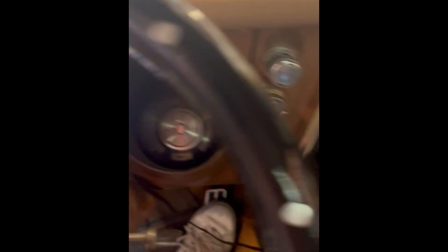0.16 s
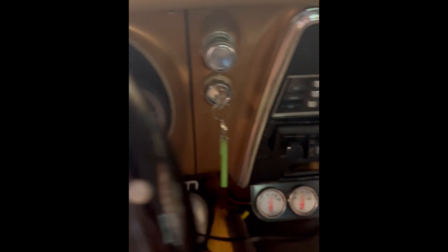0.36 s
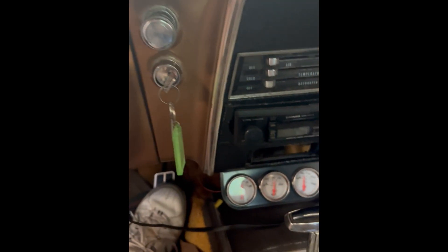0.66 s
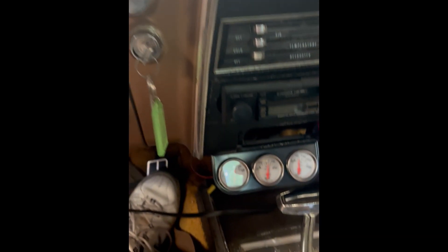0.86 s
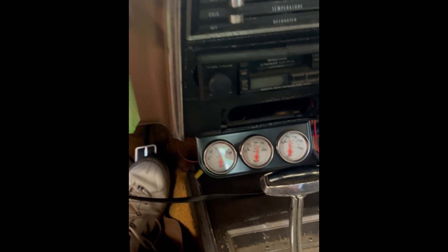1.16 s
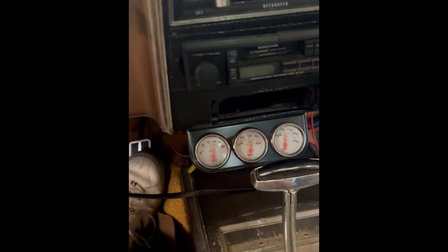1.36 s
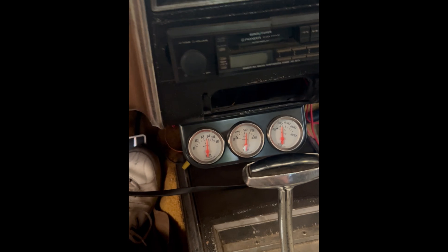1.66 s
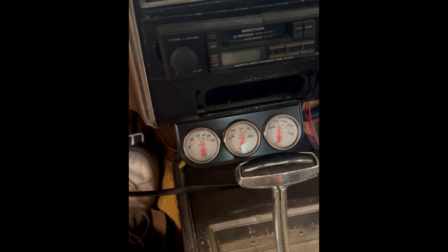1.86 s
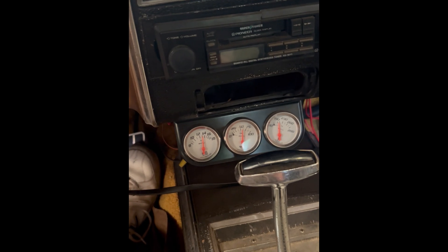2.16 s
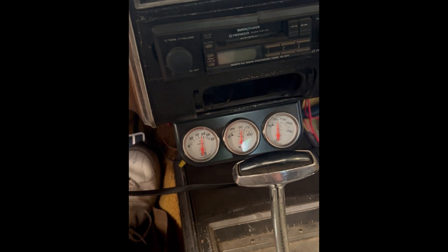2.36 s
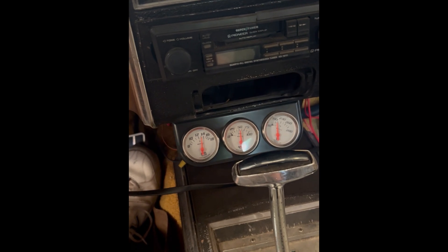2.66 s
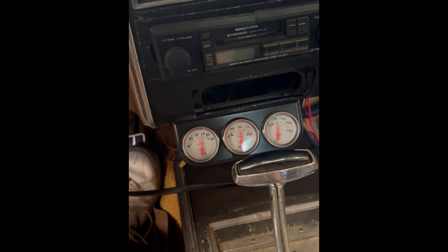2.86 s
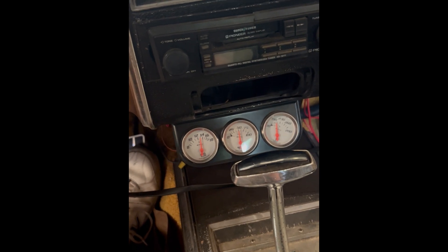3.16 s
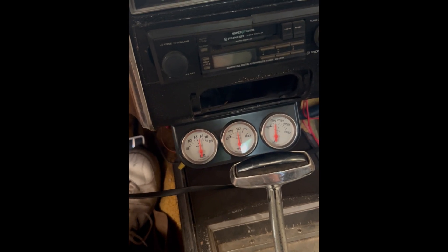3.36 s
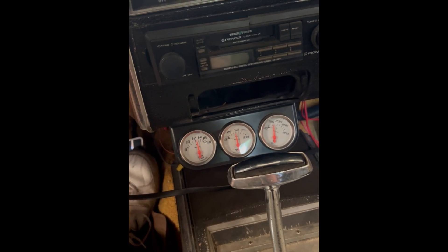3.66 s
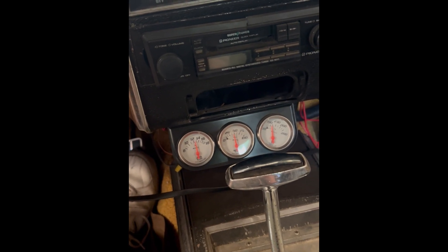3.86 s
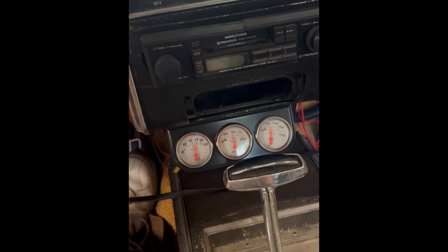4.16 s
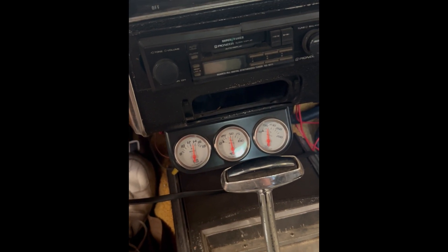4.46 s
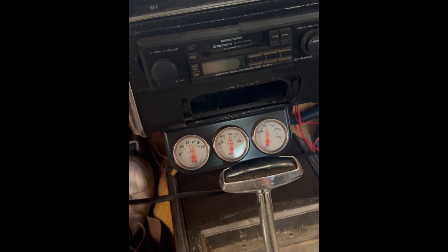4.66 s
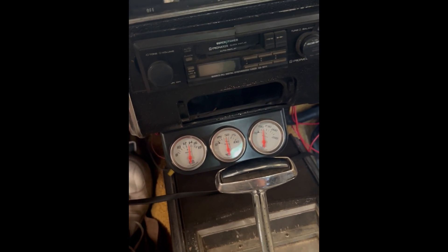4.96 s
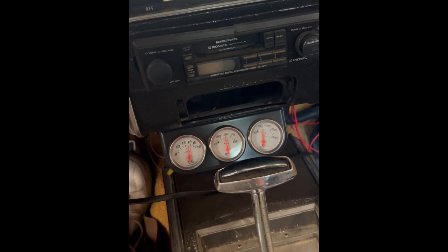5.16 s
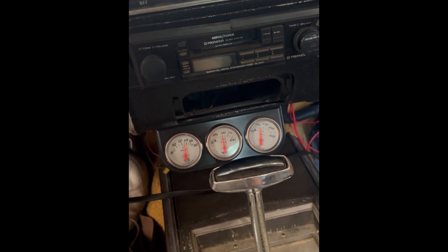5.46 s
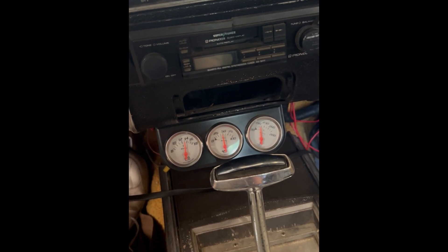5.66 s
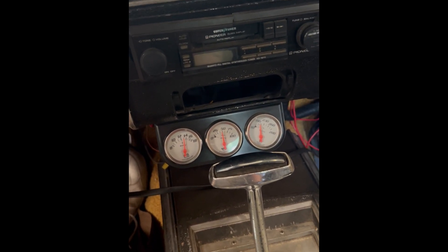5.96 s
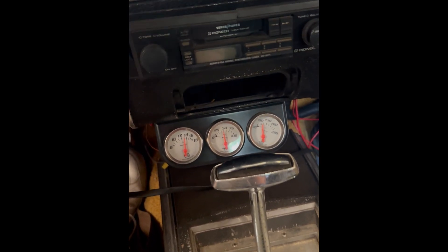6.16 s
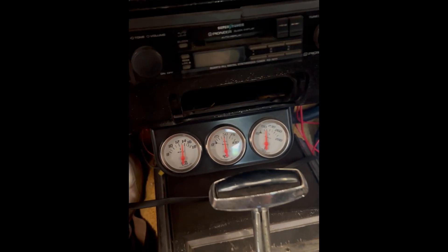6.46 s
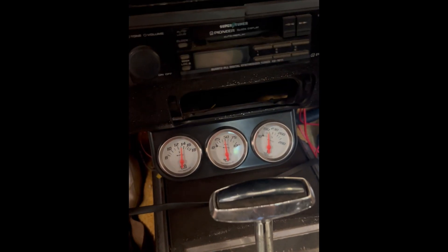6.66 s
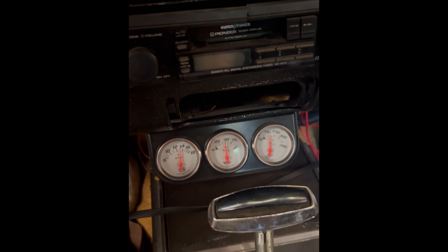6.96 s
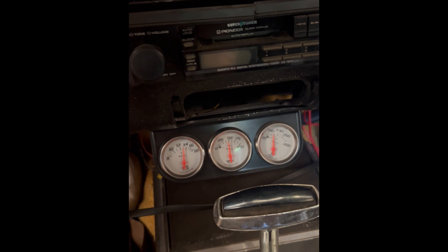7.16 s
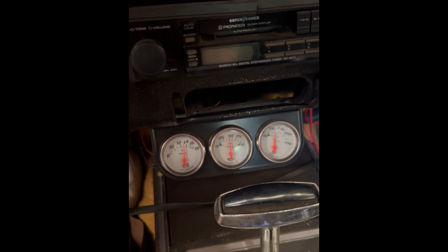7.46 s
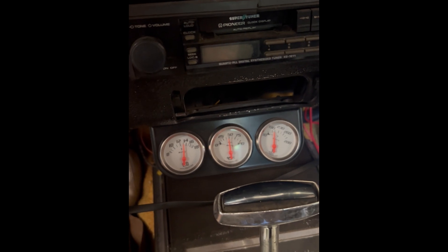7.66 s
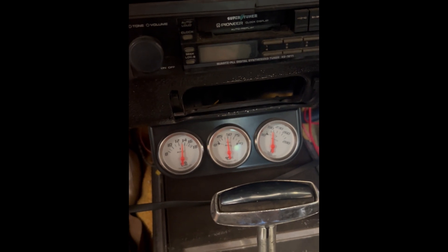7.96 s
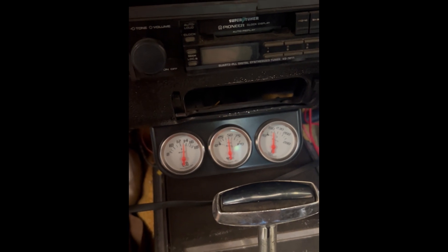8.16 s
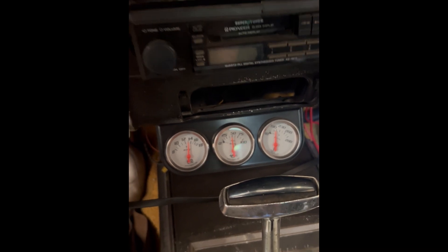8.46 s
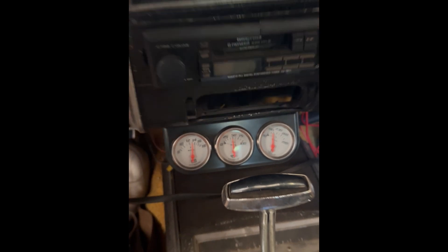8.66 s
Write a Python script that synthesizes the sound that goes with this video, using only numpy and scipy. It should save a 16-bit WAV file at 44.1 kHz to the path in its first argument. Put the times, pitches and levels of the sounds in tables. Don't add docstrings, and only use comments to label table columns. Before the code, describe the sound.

Close handheld stereo inside a stationary old car: two seconds of steady low engine boom under airy mechanical whirr, then a short whoosh as revs fall. The engine weakens, nearly dying with a few light ticks, then surges back into slow uneven throbbing. Loose panels clatter and buzz with each lurch, and small metal keys shiver brightly until the end.

```python
import sys
import numpy as np
from scipy import signal
from scipy.fft import rfft, irfft, next_fast_len
from scipy.io import wavfile
from scipy.ndimage import uniform_filter1d, minimum_filter1d

SR = 44100
rng = np.random.default_rng(int(sys.argv[2]) if len(sys.argv) > 2 else 0)


def nominal_scale(level):
    x = np.asarray(level, float) / 20
    return 10 ** x


def unload_wav(signal):
    wavfile.write(
        sys.argv[1],
        SR,
        np.round(np.clip(np.atleast_2d(signal).T, -1, 1) * 32767).astype(np.int16),
    )


N = 388521
RUN_IN = 8192

# t/s, firing rate/Hz
ENGINE = [(0, 100.7), (.6, 100.4), (1.2, 100.9), (1.85, 101.1), (2.0, 92), (2.2, 77), (2.6, 53), (3.0, 39),
          (3.5, 36), (4.0, 44), (4.45, 54.5), (4.75, 48.5), (5.0, 45), (5.5, 42.5), (6.5, 45), (7.0, 43.5),
          (8.2, 43), (8.81, 45)]
# f/Hz, width/Hz, level/dB
CABIN = [(44.3, 8.1, -26), (63.4, 5.2, -2.5), (79.7, 24, -11), (96.14, 8, 2.5), (118.2, 17.4, -11),
         (148.5, 21, -17)]


def rms_one(x):
    return x / np.sqrt(np.mean(x ** 2) + 1e-20)


def in_time(rows, early=0):
    s, *columns = np.transpose(rows)
    t = np.arange(-early, N) / SR
    return [np.interp(t, s, column) for column in columns]


def at_hz(points, hz):
    table = np.array(points, float)
    return np.interp(np.log(hz + 1), np.log(table[:, 0] + 1), table[:, 1])


def bandpass(x, low_hz, high_hz):
    return signal.sosfilt(signal.butter(2, [low_hz, high_hz], "band", fs=SR, output="sos"), x)


def resonate(x, modes):
    out = 0
    for k, (hz, width, db) in enumerate(modes):
        r = np.exp(-np.pi * width / SR)
        a = [1, -2 * r * np.cos(2 * np.pi * hz / SR), r * r]
        b = [(1 - r * r) / 2, 0, (r * r - 1) / 2]
        out = out + (-1) ** k * nominal_scale(db) * signal.lfilter(b, a, x)
    return out


def response(modes, hz):
    power = sum(nominal_scale(2 * db) / (1 + (2 * (hz - top_hz) / width) ** 2) for top_hz, width, db in modes)
    return np.sqrt(power)


def evened(x, span_s):
    return x / np.sqrt(uniform_filter1d(x ** 2, int(span_s * SR)) + 1e-12)


def drift(rate):
    r = np.exp(-80 * np.pi * rate / SR)
    slow = signal.lfilter([1], [1, -2 * r, r * r], rng.standard_normal(N // 40 + 2002))[2000:]
    return np.interp(np.arange(N) / 40, np.arange(len(slow)), rms_one(slow))


def at_ports(x, spectrum):
    # f/Hz, share
    likeness = [(100, 0.72), (1400, 0.93), (2400, 0.47), (4000, 0.3), (8000, 0.24), (15000, .7)]
    # f/Hz, phase/rad
    lead = [(100, 0), (2000, .1), (2800, 2.3), (3200, 3), (3500, .3), (4000, -.8), (5000, -1.8),
            (7000, -1.3), (15000, -1.6)]
    size = next_fast_len(N + RUN_IN)
    hz = np.arange(size // 2 + 1) * SR / size
    first, other = rfft(x, size) * nominal_scale(at_hz(spectrum, hz))
    alike = np.clip(at_hz(likeness, hz), 0, 1)
    right = alike * first * np.exp(-1j * at_hz(lead, hz)) + np.sqrt(1 - alike ** 2) * other
    return irfft(np.array([first, right]), size)[:, :N]


def orders(per_s, start, strongest, spread, wobble_db):
    # order, level/dB
    exhaust = [(1, -50), (3, -60), (4, -48), (5, -22.5), (6, -35), (7, -37.5), (8, 2.5), (9, -22.5),
               (10, -15), (11, -18), (12, -19), (13, -30.5), (14, -24.5), (15, -33.5), (16, -48), (17, -31),
               (18, -28), (19, -27.5), (20, -43.5), (21, -35), (22, -42.5), (24, -48.5), (25, -45.5),
               (26, -36), (27, -47.5), (28, -34), (29, -31.5), (30, -35.5), (31, -41), (32, -38)]
    held_hz = 100.7
    slow = per_s[::8]
    cycles = np.cumsum(slow) / SR + start
    out, power = 0, 0
    body = CABIN + [(312, 170, -43.5)]
    for order, db in exhaust:
        odd = order != 8
        gain = response(body, order * slow / 8) / response(body, order * held_hz / 8)
        gain = gain * nominal_scale(db + wobble_db * drift(3)[::8] * odd)
        gain = gain * (slow / held_hz) ** (3 * odd)
        phase = odd * (order * strongest + spread * order ** 2 + 0.13 * rng.standard_normal())
        out = out + gain * np.sin(2 * np.pi * (order * cycles + phase))
        power = power + gain ** 2 / 2
    return signal.resample_poly(out / np.sqrt(power), 8, 1, padtype="line")[:N]


def firings(per_s, steady, memory, fresh, jitter, width_hz):
    at = np.flatnonzero(np.diff(np.floor(np.cumsum(per_s) / SR)))
    chance = rng.standard_normal((2000, 3))
    keep = np.clip(memory, 0, .98)
    by_cylinder = chance[:, 2].reshape(-1, 8)
    lope = signal.lfilter([np.sqrt(1 - keep ** 2)], [1, -keep], by_cylinder, axis=0).ravel()
    strength = (steady + lope + fresh * chance[:, 1])[800:800 + len(at)]
    late = (jitter * chance[:len(at), 0] * SR / per_s[at]).astype(int)
    at = np.clip(at + late, 0, len(per_s) - 1)
    pulses = np.full(len(per_s), 1e-18)
    pulses[at] = strength
    return signal.sosfilt(signal.butter(1, width_hz, fs=SR, output="sos"), pulses)


def bumps(rows, half_s):
    kicks = np.zeros(N)
    s, db = np.transpose(rows)
    kicks[(s * SR).astype(int)] = db
    bell = np.exp(-.5 * (np.arange(-4000, 4001) / (half_s * SR)) ** 2)
    return signal.fftconvolve(kicks, bell, "same")


def lumps():
    # t/s, level/dB
    misfires = [(2.26, -3), (2.644, -7), (2.883, -2), (3.128, 2.5), (3.317, -3), (3.507, -2), (3.557, -11),
                (3.966, -3.5), (4.116, -10), (4.325, -7), (4.794, -6), (5.024, -3.5), (5.118, -7.1),
                (5.293, -6), (5.567, -1.5), (5.847, -12), (5.927, -5), (6.086, -5), (6.351, -8.5),
                (6.705, -9), (6.984, -6), (7.084, -3), (7.363, -5), (7.727, -11.2), (7.932, -7.5),
                (8.356, -11), (8.491, 0), (8.695, -6), (7.69, -13), (3.3, -5)]
    # t/s, level/dB
    surges = [(2.749, 5), (3.063, 6.5), (3.278, 3), (3.417, 5.6), (3.627, 2), (3.841, 7.6), (4.295, -0.5),
              (4.595, 5.5), (4.739, 3.5), (4.984, 4), (5.208, 4), (5.358, 6), (5.632, 4), (5.742, 5),
              (5.892, 2), (6.899, 5.3), (7.129, 7), (7.503, 3), (8.296, 1.5), (8.551, 4.5)]
    return bumps(misfires, half_s=0.012) + bumps(surges, half_s=0.015)


def cabin_boom(per_s, pulses, share, level_db):
    uneven = evened(resonate(resonate(pulses, CABIN), [(85, 80, 0)]), .07)
    uneven = bandpass(uneven, 45, 190)[RUN_IN:]
    clean = orders(per_s, start=0.022, strongest=.93, spread=0.004045, wobble_db=0.5)
    boom = nominal_scale(level_db) * (np.sqrt(1 - share) * clean + np.sqrt(share) * uneven)
    throb = np.sin(2 * np.pi * np.cumsum(per_s) / SR)
    return boom + share * nominal_scale(-46.5) * throb


def floor_pan(pulses, noise, share, swing_db):
    # f/Hz, width/Hz, level/dB
    pan_modes = [(192.8, 8.1, 4.5), (240.8, 5.3, 3.5), (277, 39, -4), (333.4, 13, 4), (350.5, 32, -0.5)]
    rung = bandpass(resonate(rms_one(pulses) + 3 * noise, pan_modes), 165, 430)
    return evened(rung, 0.16)[:, RUN_IN:] * nominal_scale(-38 + 1.01 * swing_db + share * 1.3 * drift(4.6))


def dash_panel(pulses, noise, share, swing_db):
    # f/Hz, width/Hz, level/dB
    dash_modes = [(470, 70, -2), (530, 50, -4), (610, 28, 1), (790, 50, -4), (940, 80, -9),
                  (1100, 200, -12)]
    rung = bandpass(resonate(.3 * rms_one(pulses) + 3 * noise, dash_modes), 430, 1900)
    return evened(rung, .3)[:, RUN_IN:] * nominal_scale(-48.5 + swing_db + share * (3.0 * drift(7.7) - 0.5))


def engine():
    # t/s, level/dB
    effort = [(0, -11), (1.2, -11), (1.98, -10), (2.1, -13.5), (2.5, -19), (3.0, -25.5), (3.4, -28.5),
              (3.9, -21), (4.28, -10), (4.8, -12), (5.7, -15.5), (6.25, -11), (6.6, -9.5), (6.95, -12.5),
              (7.6, -11), (8.1, -10.5), (8.4, -11.5), (8.81, -10.5)]
    early_per_s, = in_time(ENGINE, RUN_IN)
    per_s = early_per_s[RUN_IN:]
    share = 1 / (1 + np.exp((per_s - 68) / 7))
    pulses = firings(early_per_s, steady=.2, memory=.8, fresh=.5, jitter=.05, width_hz=300)
    effort_db, = in_time(effort)
    lumps_db = lumps()
    boom = cabin_boom(per_s, pulses, share, effort_db + lumps_db)
    gas = rng.standard_normal((2, len(pulses)))
    swing_db = effort_db - effort_db[0] + 0.15 * lumps_db
    pan = floor_pan(pulses, gas, share, swing_db)
    dash = dash_panel(pulses, gas, share, swing_db)
    side = nominal_scale(-29.0) * pan[1] + nominal_scale(-30) * pan[0]
    side += nominal_scale(-14) * dash[1] + nominal_scale(-18.5) * dash[0]
    side += nominal_scale(-35) * np.roll(boom, 90) + nominal_scale(-38.5) * boom
    return boom + pan[0] + dash[0] + side * [[1], [-1]]


def whirr():
    # f/Hz, level/dB per Hz
    colour = [(530, -33), (900, -12.5), (1060, -13), (1600, -11), (3000, -12.5), (5990, -16.5),
              (7520, -14.5), (11800, -18.5), (15600, -27)]
    # t/s, level/dB
    loudness = [
        (0, -60),
        (1.59, -58),
        (1.63, -54),
        (1.72, -58),
        (1.92, -57.5),
        (1.97, -51.5),
        (2.17, -54.5),
        (2.27, -61.5),
        (2.6, -69.5),
    ]
    # f/Hz, width/Hz, level/dB
    whines = [(2670, 250, -5), (3660, 87, -0.5), (7900, 61, -3.5), (10200, 60, -3)]
    level_db, = in_time(loudness)
    noise = rng.standard_normal((2, N))
    flicker_db = 1.2 * drift(12)
    heard = at_ports(noise + 0.91 * resonate(noise, whines), colour)
    return nominal_scale(level_db + 3.5 + flicker_db) * rms_one(heard)


def knocks():
    # t/s, rattle peak level/dB
    singles = [(2.5666, -41), (2.7304, -52), (2.9205, -42), (2.9974, -44.5), (3.039, -56), (3.2196, -41.5),
               (3.322, -43.5), (3.394, -40.5), (3.557, -37), (3.6047, -37.5), (3.6805, -33.5),
               (3.7634, -32), (3.801, -30)]
    # first t/s, last t/s, rattle peak level/dB, swell over the run/dB
    lurches = [(3.968, 4.0474, -30, 2), (4.1335, 4.1794, -23, -5.5), (4.2573, 4.4694, -25, -14.5),
               (4.579, 4.7257, -31, -4), (4.811, 4.813, -32.5, 0), (4.922, 5.0823, -31, -3.5),
               (5.1975, 5.3223, -33.5, 4), (5.4076, 5.456, -31, 0), (5.5672, 5.5994, -28.5, -4),
               (5.686, 5.7276, -28.5, -0.5), (5.8538, 5.8534, -25.5, 0), (5.9854, 6.018, -29, 0),
               (6.095, 6.1451, -27, -3), (6.2305, 6.3534, -29, -6), (6.4433, 6.4704, -35.5, 8.5),
               (6.5804, 6.7144, -22.5, -10), (6.779, 6.8764, -29.5, -4), (6.9902, 7.0354, -29, -1.4),
               (7.088, 7.2469, -25, -6.5), (7.3182, 7.4619, -30, 3.5), (7.5185, 7.618, -27.5, -2),
               (7.6894, 7.735, -31, 4.5), (7.786, 7.894, -28, 0.5), (7.9946, 7.9952, -29.5, 0),
               (8.111, 8.2027, -24.5, -7), (8.254, 8.2556, -26, 0), (8.3726, 8.4115, -30, 1),
               (8.4846, 8.513, -27, 3), (8.6403, 8.6423, -26, 0), (8.7427, 8.79, -24, -2.5)]
    gap_s = .047
    rows = list(singles)
    for first, last, db, swell_db in lurches:
        along = np.linspace(0, 1, 1 + round((last - first) / gap_s))
        rows += zip(first + along * (last - first), db + along * swell_db)
    s, db = np.transpose(rows)
    kicks = np.full(N, 1e-18)
    kicks[(s * SR).astype(int) - 220] = nominal_scale(db)
    return kicks


def jolted(kicks, rise_s, fall_s):
    fall, rise = np.exp(-1 / (fall_s * SR)), np.exp(-1 / (rise_s * SR))
    dying = signal.lfilter([1], [1, -fall], kicks)
    return signal.lfilter([1 - rise], [1, -rise], dying)


def chatter(per_s, spread_db, hiss):
    sizes = nominal_scale(spread_db * np.minimum(rng.exponential(1, (2, N)), 4))
    sizes = sizes * rng.choice([-1, 1], (2, N))
    touching = rng.random((2, N)) < per_s / SR
    return rms_one(sizes * touching) + hiss * rng.standard_normal((2, N))


def pings(shake, per_s, low_hz, high_hz, ring_s):
    at = np.flatnonzero(rng.random(N) < per_s / SR)
    chance = rng.random((len(at), 3))
    hz = low_hz * (high_hz / low_hz) ** chance[:, :1]
    t = np.arange(1000) / SR
    size = shake[at, None] * nominal_scale(9 * chance[:, 1:2])
    shape = nominal_scale(-60 * t / ring_s) * (1 - np.exp(-t / 0.0032))
    rung = size * np.sin(2 * np.pi * hz * t) * shape
    where = (at[:, None] + np.arange(len(t))).ravel()
    sides = [rung, rung * np.sign(chance[:, 2:] - .5)]
    return np.array([np.bincount(where, side.ravel(), N + len(t))[:N] for side in sides])


def trim():
    # f/Hz, level/dB per Hz
    rattle = [(530, -9), (900, -31), (1420, -11.5), (2070, -7.5), (2250, -5.5), (3220, -5), (3500, -7),
              (7430, -6), (8880, -7), (12100, -8.5), (15600, -15)]
    # f/Hz, width/Hz, level/dB
    trim_modes = [(576, 6.6, -6), (779.6, 21, 8.5), (954, 33, -5), (1237, 23, -5.5), (1607, 41, -6),
                  (1770, 22, -11.5), (2060, 40, -7.5), (2210, 11, -25), (2360, 17, -9), (3280, 60, -33),
                  (4520, 10, -6.5)]
    contacts, kicks = chatter(per_s=2500, spread_db=-1.5, hiss=0.79), knocks()
    bursts = jolted(kicks * nominal_scale(-9), rise_s=.007, fall_s=.027) * nominal_scale(2.2 * drift(30))
    over_hz = np.clip(in_time(ENGINE)[0], 0, 56) - 44
    buzz_db = -14.5 - 12.5 + 0.896 * over_hz + 2.62 * drift(21)
    buzz = jolted(kicks, rise_s=0.089, fall_s=0.13) * nominal_scale(buzz_db)
    shake = np.hypot(bursts, buzz)
    hiss = shake * rms_one(at_ports(contacts, rattle))
    panels = resonate(shake * chatter(per_s=120, spread_db=-0.5, hiss=0.21), trim_modes)
    struck = np.roll(kicks, 400) * nominal_scale(3.5 * rng.standard_normal(N))
    panels += nominal_scale(14) * resonate(struck, [(780, 40, -1.5), (896, 77, -5), (2040, 55, -9.5)])
    rings = pings(shake, per_s=700, low_hz=790, high_hz=13960, ring_s=0.091)
    thuds = pings(shake, per_s=60, low_hz=671, high_hz=1257, ring_s=0.11)
    ringing = 4.67 * panels + 0.27 * rings + 0.36 * thuds
    return 0.93 * hiss + at_ports(ringing, [(500, -4), (3000, 2.5), (12000, -1.0)])


def key_ring():
    # t/s, peak level/dB, f/Hz
    shakes = [(3.394, -59, 9700), (3.6047, -47.5, 8640), (3.7634, -55, 9400), (3.8, -30, 9140),
              (3.969, -38.5, 8630), (4.003, -38, 9040), (4.0474, -45, 8910), (4.1315, -34.5, 9100),
              (4.1794, -51, 9300), (4.2589, -36.5, 9600), (4.4094, -40, 9350), (4.813, -51, 8780),
              (5.3223, -46, 9220), (5.5692, -47, 8300), (5.7276, -41, 9040), (5.8534, -39.5, 8670),
              (6.2322, -41, 8800), (6.5824, -44, 9800), (7.3188, -54, 8900), (7.4619, -50, 9250),
              (7.5205, -36.5, 8900), (7.6877, -49, 8750), (7.7843, -48, 9200), (7.894, -51, 8610),
              (7.9952, -45, 8800), (8.3706, -48, 8600), (8.6423, -45, 8800), (8.7415, -54, 9100)]
    shiver, out = chatter(per_s=2100, spread_db=-10.0, hiss=0.53), np.zeros((2, N))
    t = np.arange(SR // 3) / SR
    shape = (1 - np.exp(-t / 0.0008)) * np.exp(-t / .045)
    for s, db, hz in shakes:
        at = round(s * SR)
        bands = [(hz - 220, 350, 0), (hz + 250, 400, -2)]
        rung = rms_one(resonate(shiver[:, at:at + len(t)], bands))
        out[:, at:at + len(t)] += nominal_scale(db) * rung * shape[:N - at]
    return at_ports(out, [(100, 0), (20000, 0.0042)])


def scene():
    return engine() + whirr() + trim() + key_ring()


def band_limit(x):
    return signal.sosfilt(signal.butter(12, 15830, fs=SR, output="sos"), x)


def record(dry):
    peak = -minimum_filter1d(-np.abs(dry).max(axis=0), 1200)
    gain = uniform_filter1d(np.minimum(1, .9 / (peak + 1e-9)), 1200)
    top = signal.cheby2(12, 60, 16300, fs=SR, output="sos")
    mix = signal.sosfilt(top, gain * dry)
    return band_limit(mix)


dry = scene()
out = record(dry)
unload_wav(out)
```